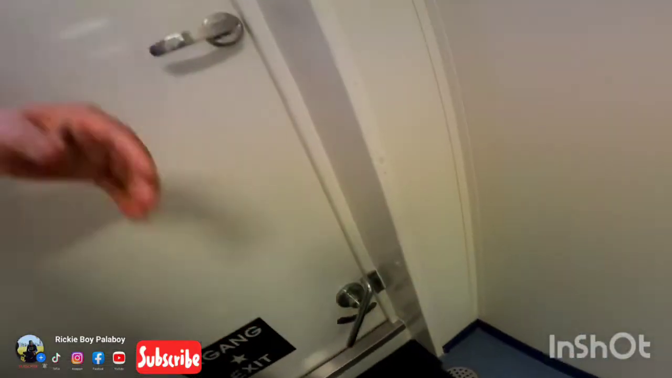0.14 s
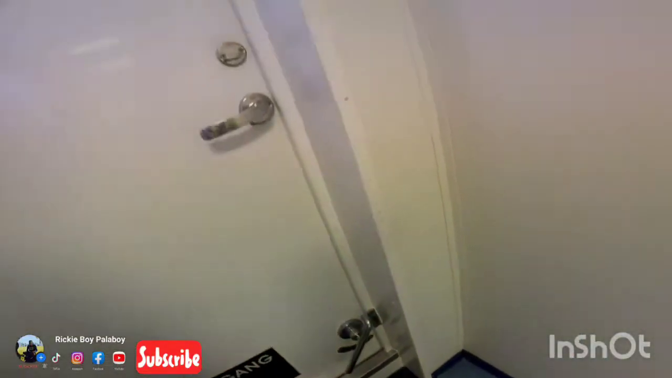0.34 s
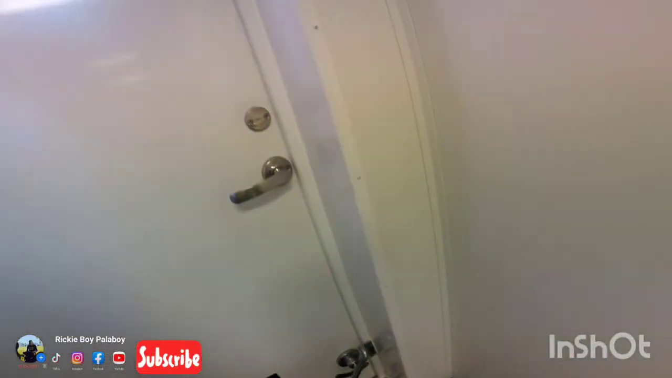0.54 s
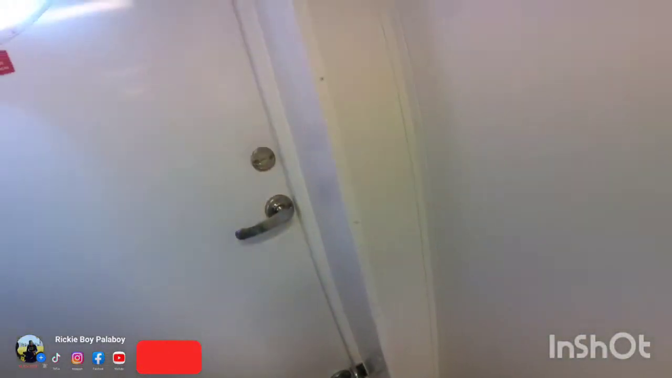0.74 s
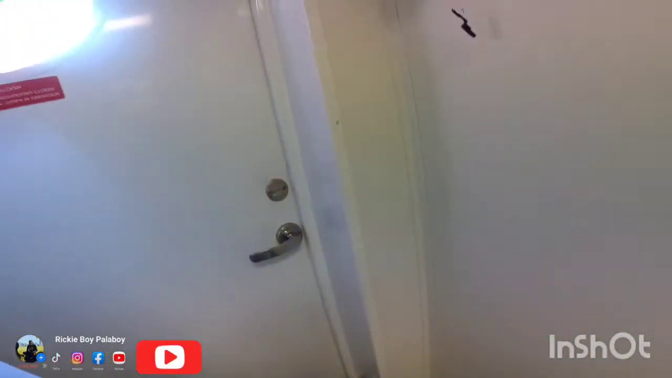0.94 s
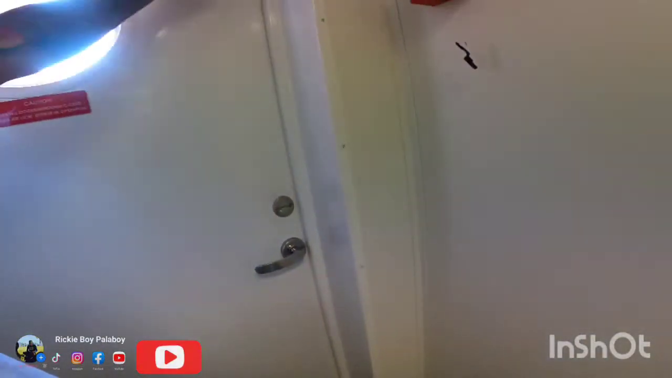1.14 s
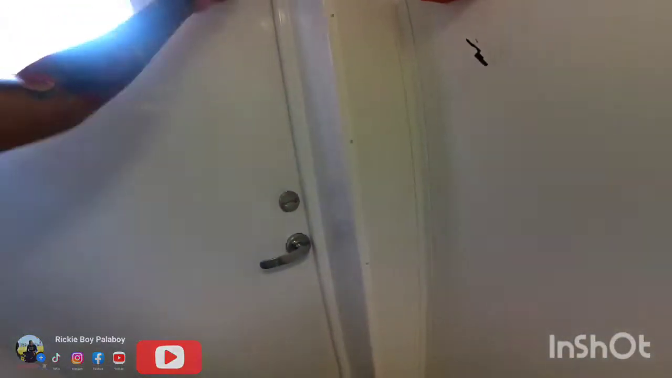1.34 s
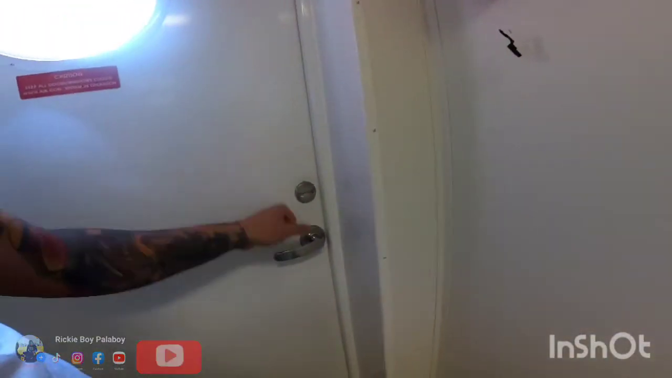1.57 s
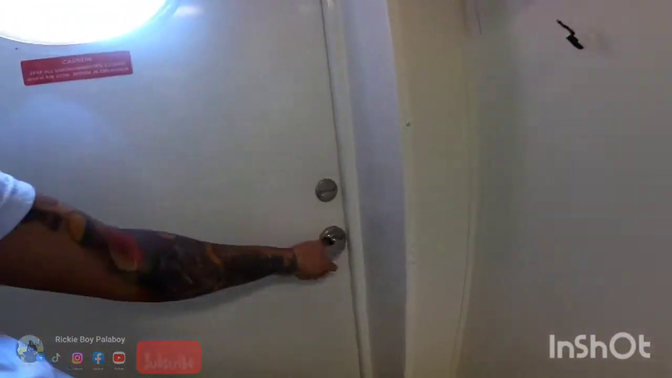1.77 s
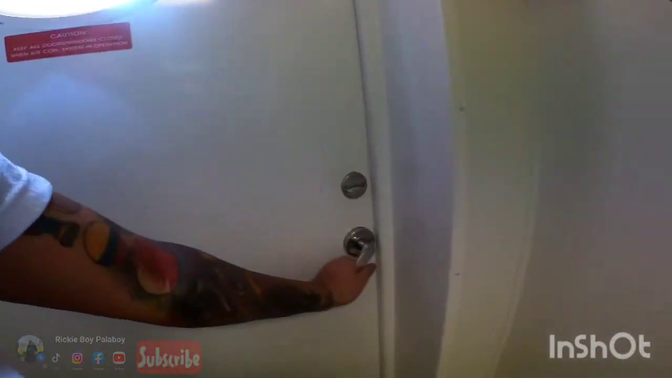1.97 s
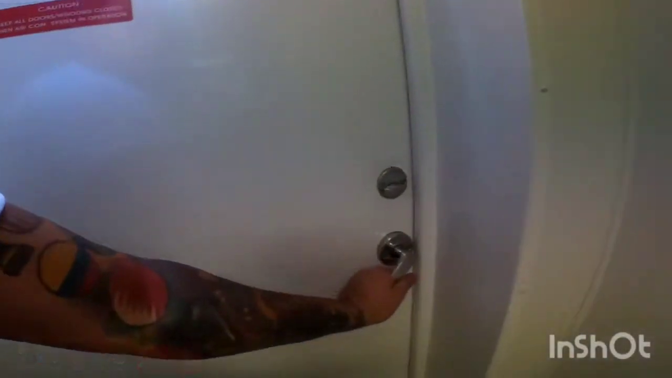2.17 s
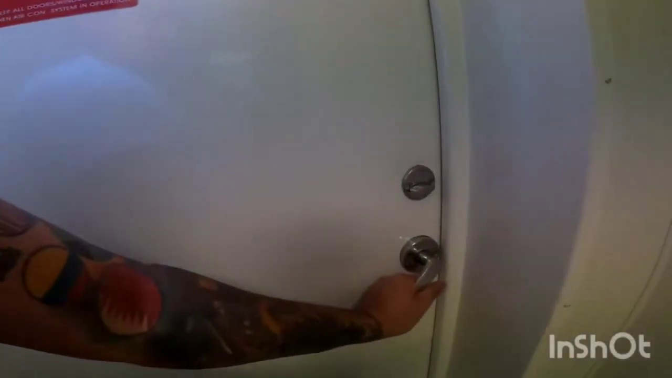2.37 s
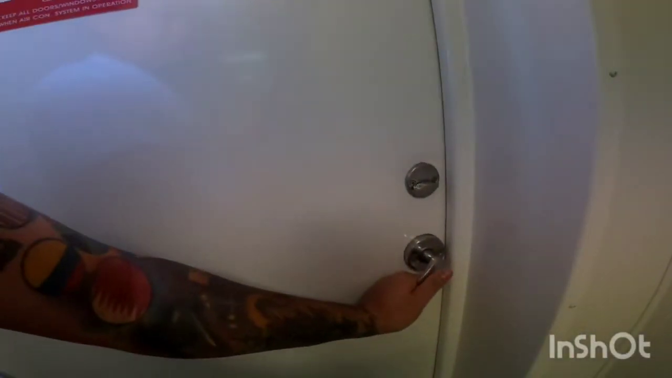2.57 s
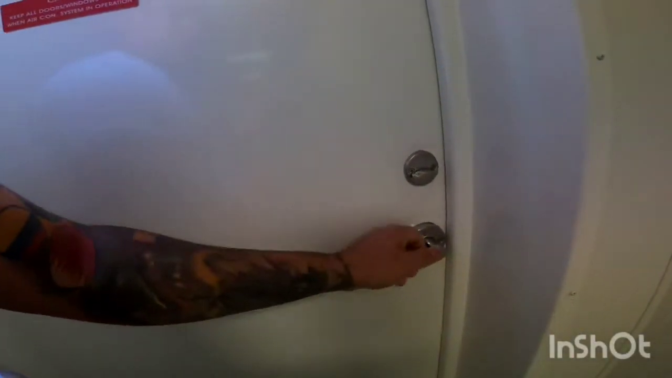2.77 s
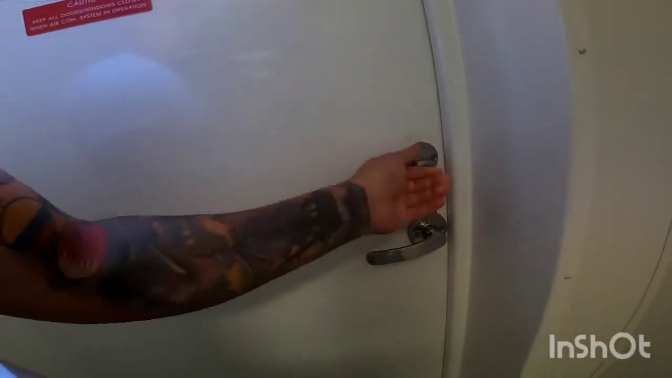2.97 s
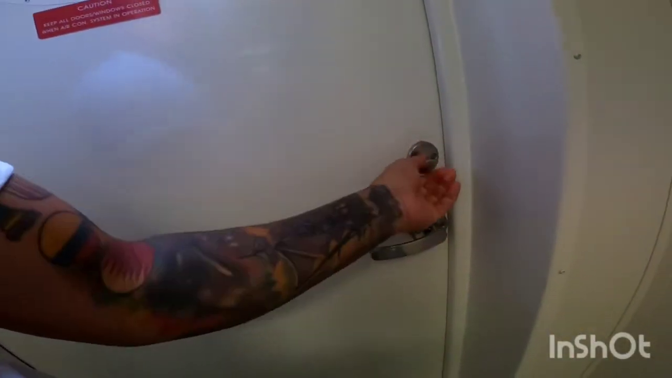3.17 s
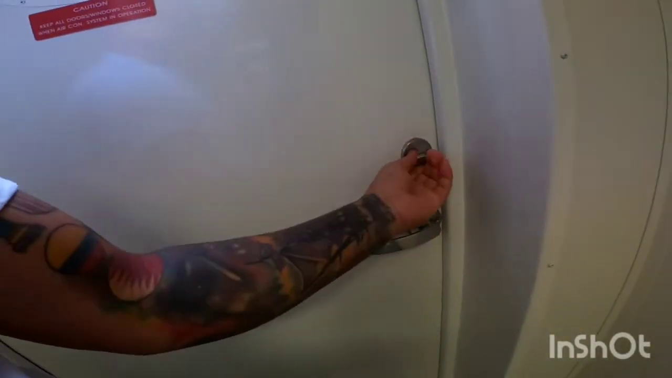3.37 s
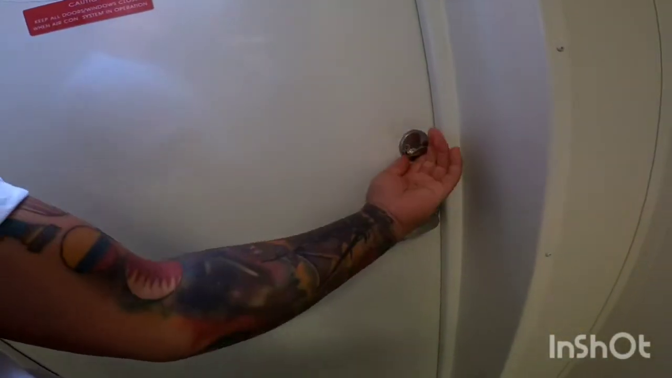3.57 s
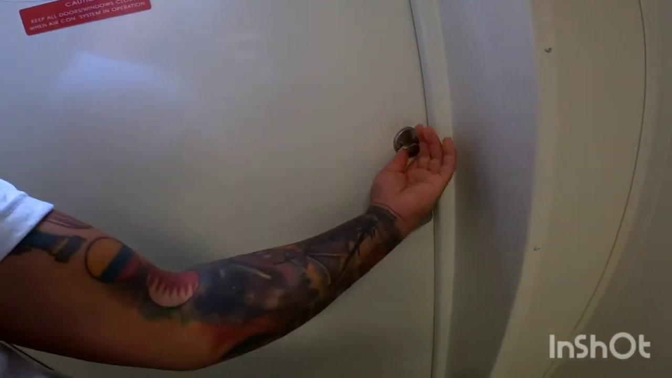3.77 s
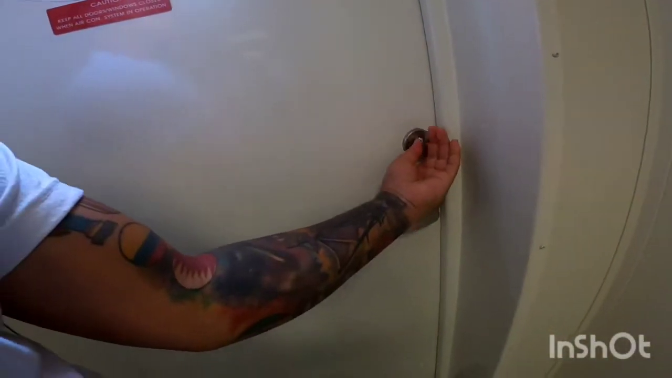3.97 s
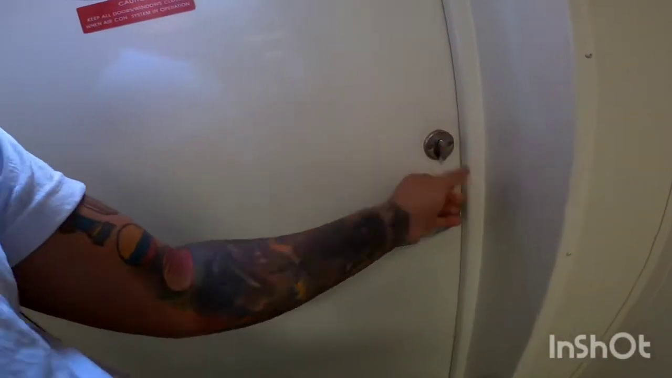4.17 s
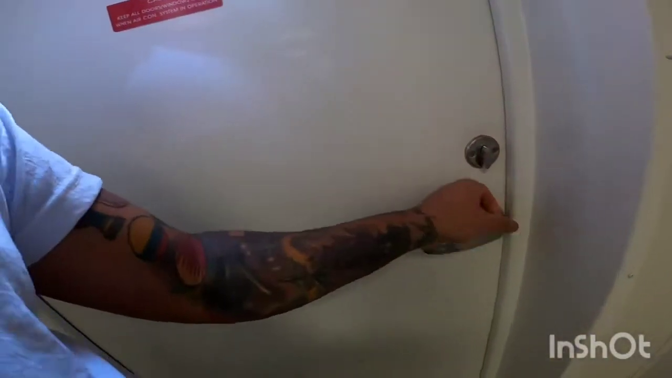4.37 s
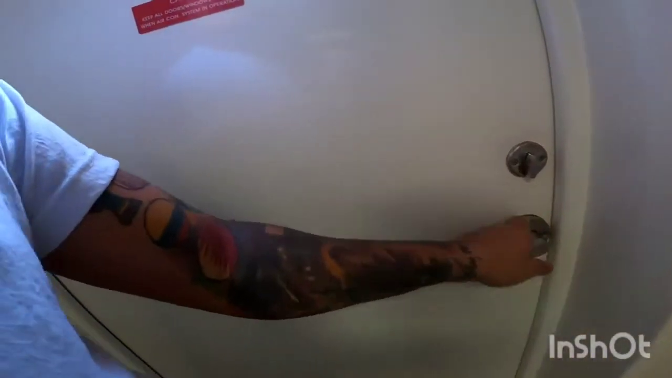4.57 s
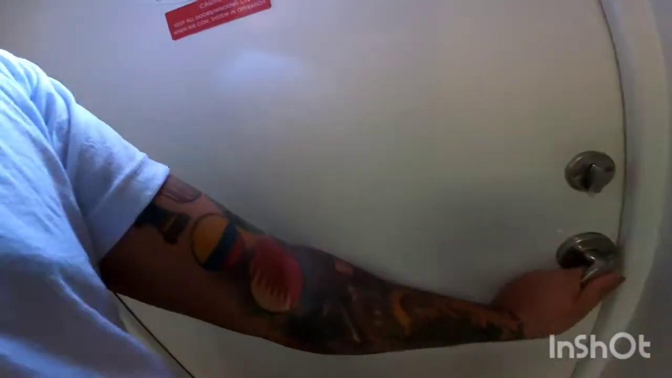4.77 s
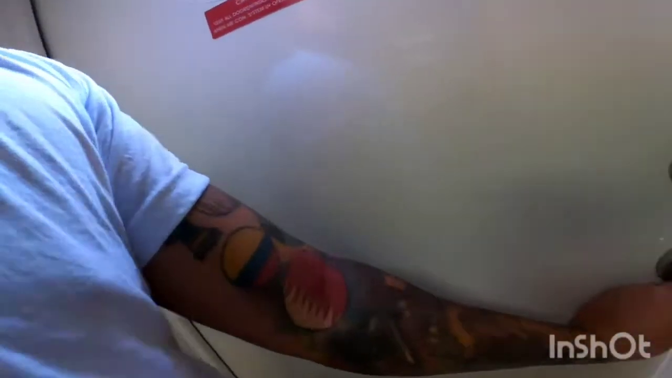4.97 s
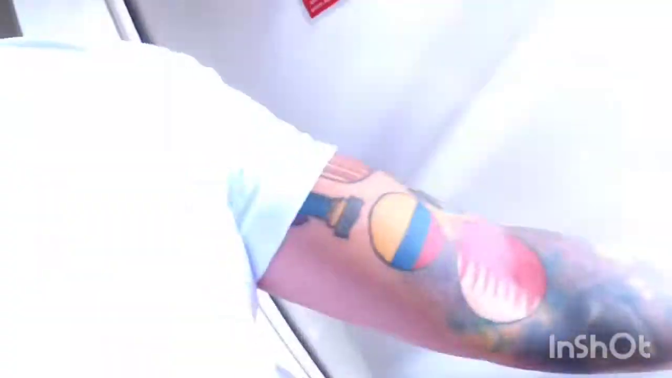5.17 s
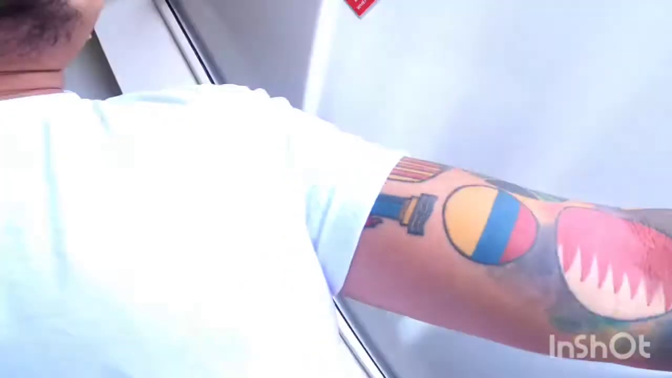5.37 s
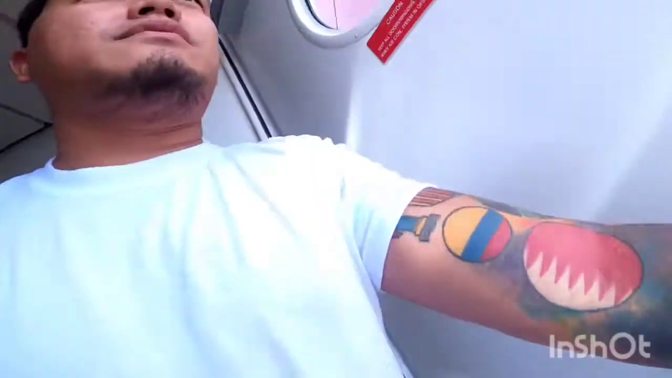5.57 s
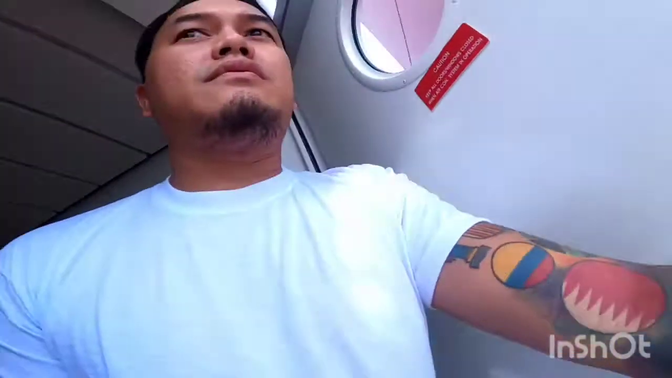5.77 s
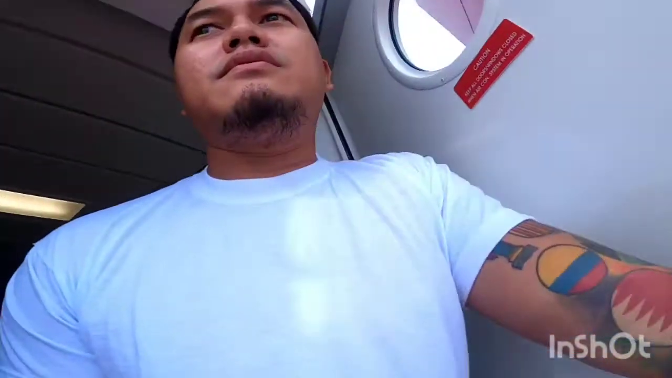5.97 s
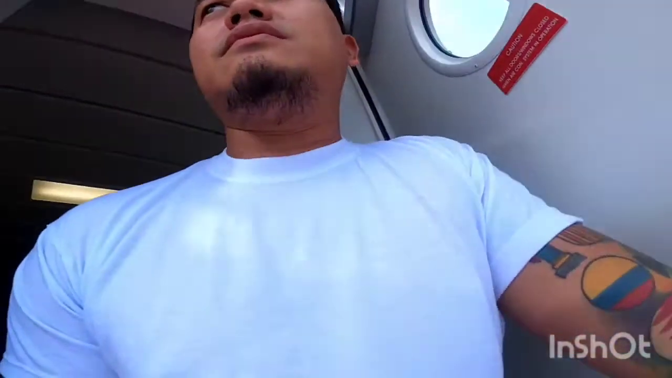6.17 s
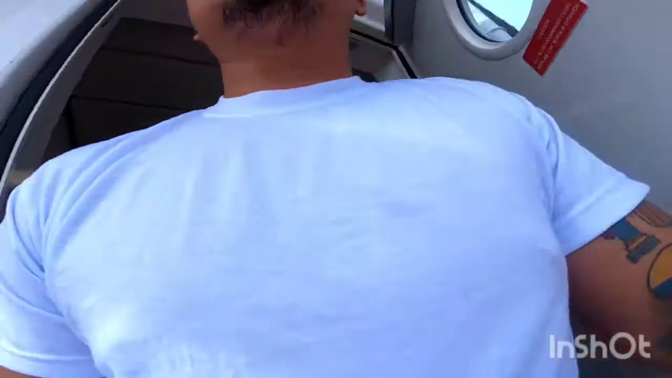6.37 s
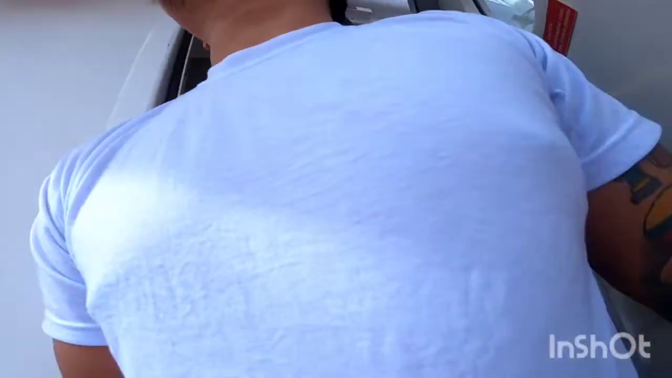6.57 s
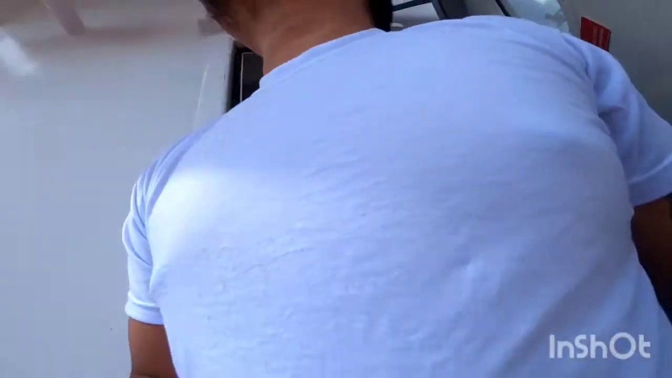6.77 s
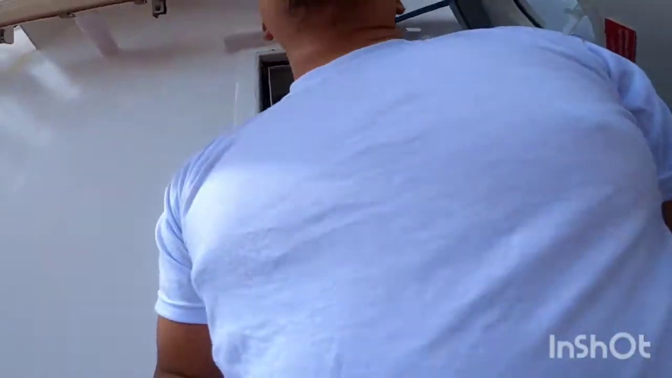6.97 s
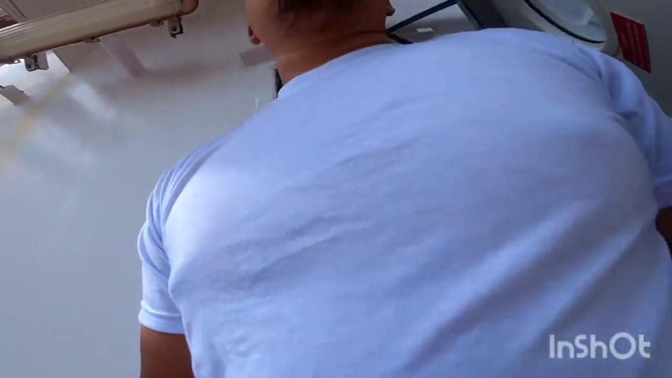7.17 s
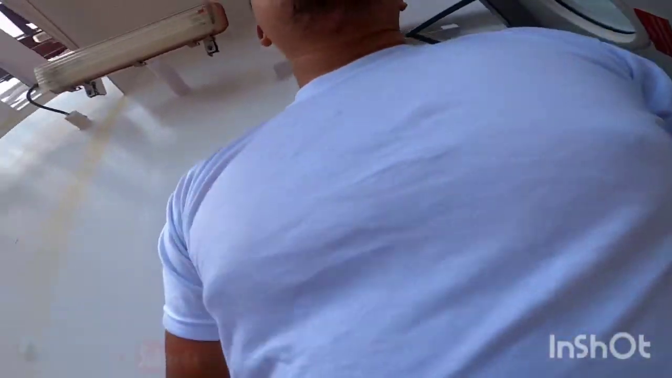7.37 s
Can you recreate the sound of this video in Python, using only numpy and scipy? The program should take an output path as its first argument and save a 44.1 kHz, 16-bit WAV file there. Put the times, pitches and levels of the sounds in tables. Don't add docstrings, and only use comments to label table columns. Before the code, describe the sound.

Low hull throb, close metal clacks and a heavy door's boom, then machinery and ventilation drone flooding in as the door swings out.

```python
import sys
import numpy as np
from scipy import signal
from scipy.fft import rfft, irfft
from scipy.io import wavfile
from scipy.ndimage import uniform_filter1d

SR = 44100
rng = np.random.default_rng(int(sys.argv[2]) if len(sys.argv) > 2 else 0)


def ratio_of_db(decibels):
    return 10 ** (np.asarray(decibels, float) / 20)


def inscribe(sig):
    pcm = np.round(np.clip(np.atleast_2d(sig).T, -1, 1) * 32767)
    wavfile.write(sys.argv[1], SR, pcm.astype(np.int16))


N = 328104


def evened(x):
    return x / np.sqrt(np.mean(x ** 2) + 1e-20)


def read(points, hz):
    f, value = np.transpose(points)
    return np.interp(np.log(hz + 1), np.log(f + 1), value)


def played(rows, t):
    s, *columns = np.transpose(rows)
    from_start = (s[0] < 0.05) * (t < 0.1)
    to_end = (s[-1] > 7.3) * (t > 7)
    gate = np.clip(np.minimum(t - s[0], s[-1] - t) / 0.021 + from_start + to_end, 0, 1)
    return gate, *(np.interp(t, s, column) for column in columns)


def peaks_db(modes, hz):
    return sum(db / (1 + (2 * (hz - f) / width) ** 2) for f, width, db in modes)


def add(mix, s, sound):
    part = mix[round(s * SR):][:len(sound)]
    part += sound[:len(part)]


def bump(t, middle, length):
    return np.cos(np.pi * np.clip((t - middle) / length, -0.5, 0.5))


def passing(rows, t):
    return sum(np.array(db)[:, None] * bump(t, s, length) ** 2 for s, length, *db in rows)


def drift(rate):
    t = np.arange(N) / SR
    waves = [np.sin(2 * np.pi * (f * t + rng.random())) / np.sqrt(f) for f in np.geomspace(1.6, rate, 16)]
    return evened(sum(waves))


# (frequency [Hz], lead [radians])
LEFT_LEAD = [(250, 0), (500, -.2), (1000, -.75), (1600, -.55), (2800, -.8), (4000, -1.0), (5500, -.5)]
# (time [s], share of the lead)
FACING = [(0, .1), (1.3, 0.14), (2.0, 0.74), (6.1, 0.9), (6.7, 0.53), (7.44, 0.43)]
HOP = 256


def noise(field_db, same, lean, band, patchy_db, size=2048, turn=((0, 1), (8, 1))):
    hz = np.fft.rfftfreq(size, 1 / SR)[:, None]
    t = np.arange(N // HOP + 9) * HOP / SR
    a, b, c, d, patches = rng.standard_normal((len(t), len(hz), 5)).T
    patches = uniform_filter1d(patches, size=size // 128, axis=0)
    patches = evened(uniform_filter1d(patches, size=16, axis=1))
    colour_db, moves = field_db(hz, t)
    inband = (hz > band[0]) & (hz < band[1])
    unit = np.sqrt(np.sum(ratio_of_db(2 * colour_db) * inband) * 4 * HOP / size / 0.68)
    like = np.clip(read(same, hz), 0, 1)
    lag = np.exp(-1j * read(LEFT_LEAD, hz) * played(FACING, t)[1])
    left = a + 1j * b
    right = like * left * lag + np.sqrt(1 - like ** 2) * (c + 1j * d)
    lean_db = read(lean, hz) / 2 * np.interp(t, *np.transpose(turn))
    z = np.array([left * ratio_of_db(lean_db), right / ratio_of_db(lean_db)])
    z = z * ratio_of_db(colour_db + patchy_db * patches) * moves / unit
    return signal.istft(z, nperseg=size, noverlap=size - HOP)[1][:, :N]


# (time [s], level [dB])
INSIDE = [(0, -47), (1.55, -45), (2, -42.5), (2.6, -45), (4.5, -42.5), (4.9, -40.5), (5.3, -39)]
# (frequency [Hz], level [dB per Hz])
INSIDE_COLOUR = [(20, -5.5), (70, -0.5), (110, -11.5), (250, -18.5), (450, -22), (600, -27), (1100, -31),
                 (1650, -35.5), (2000, -42.5), (2800, -50.5), (4000, -57), (5500, -60.5), (8000, -67.5),
                 (10000, -80), (15000, -86.5)]
# (frequency [Hz], width [Hz], level [dB])
DUCTS = [(73.4, 5.5, -4), (152, 24, 6.5), (261.5, 47, 6), (311.3, 29, 5.5), (457, 27.6, 9), (850, 130, 0.5)]
# (frequency [Hz], likeness [0-1])
SAME_IN = [(60, 1), (270, 1), (580, 0.94), (1100, 1), (2800, 0.72), (4000, 0.43), (5500, .1)]
# (frequency [Hz], left minus right [dB])
LEAN_IN = [(600, -0.5), (1100, 0.5), (2800, 3), (5500, 1), (15000, -1.5)]


def inside():
    def field(hz, t):
        gate, level_db = played(INSIDE, t)
        return read(INSIDE_COLOUR, hz) + peaks_db(DUCTS, hz) * 0.6, gate * ratio_of_db(level_db)
    return noise(field, SAME_IN, LEAN_IN, (250, 2000), patchy_db=1.44)


# (middle [s], length [s], level [dB], pitch [Hz])
SWELLS = [(0.03, 0.27, -26.5, 43.7), (0.263, 0.36, -32, 44.9), (0.56, 0.62, -30.5, 44.33),
          (0.75, 0.11, -23, 44.7), (1.02, 0.54, -26.5, 44.95), (1.268, 0.1, -28.5, 45.6),
          (1.85, 0.85, -25, 43.48), (2.15, 0.56, -24.5, 40.6), (2.693, 0.32, -34, 42.4),
          (3.003, 0.49, -34.5, 43.2), (3.304, 0.23, -26, 44.06), (3.562, 0.84, -32, 43.8),
          (4.077, 0.36, -25.5, 44), (4.373, 0.29, -26, 44), (4.708, 0.22, -28, 46.6),
          (5.094, 0.7, -30.5, 43.7), (5.521, 0.84, -27.5, 42.53), (5.843, 0.089, -28, 52),
          (6.2, 0.74, -31.5, 45.14), (6.833, 0.46, -34, 42.5), (7.26, 0.36, -36, 42)]


def throb():
    out = np.zeros(N)
    for s, length, db, hz in SWELLS:
        start = max(s - length / 2, 0)
        now = np.arange(start, s + length / 2, 1 / SR)
        turn = 2 * np.pi * (hz * now + rng.random())
        wave = np.sin(turn) - ratio_of_db(-18) * np.cos(2 * turn)
        add(out, start, ratio_of_db(db) * bump(now, s, length) * wave)
    return out


# (middle [s], length [s], level [dB])
PUMP = [
    (0.702, 1.3, -50),
    (2.004, 0.89, -49),
    (4.152, 2.9, -48.5),
    (6.207, 2.2, -34.5),
]
PUMP_HZ = 147.6


def pump():
    t = np.arange(N) / SR
    hum = np.sin(2 * np.pi * np.cumsum(PUMP_HZ * (1 + 0.01197 * drift(13))) / SR) * ratio_of_db(3.9 * drift(22))
    return hum * sum(ratio_of_db(db) * bump(t, s, length) for s, length, db in PUMP)


FAN_HZ = 196.95
FAN_RISE_S, FAN_OPEN_S = 4.75, 5.236
FAN_SHUT_DB = [-51.5, -57.5, -67, -81.5]
FAN_OPEN_DB = [-27, -36, -46, -47]
# (middle [s], length [s], tone [dB], second multiple [dB], upper multiples [dB])
NODES = [
    (5.3, 1, -1, 5, 4),
    (6.15, 1, 1, -6, -4),
    (6.6, 0.47, -3.5, -2, 2),
    (7.0, 0.19, -5.5, 0, 0),
    (7.2, 0.89, 1.5, 0, 0),
]


def fan():
    t = np.arange(N) / SR
    turns = np.cumsum(FAN_HZ * (1 + 0.0053 * drift(12))) / SR
    opened = np.clip((t - FAN_RISE_S) / (FAN_OPEN_S - FAN_RISE_S), 0, 1)
    first_db, second_db, upper_db = passing(NODES, t)
    out = np.zeros(N)
    for k, node_db in enumerate([first_db, second_db, upper_db, upper_db]):
        db = FAN_SHUT_DB[k] + opened * (FAN_OPEN_DB[k] - FAN_SHUT_DB[k] + node_db)
        out = out + ratio_of_db(db + 1.9 * drift(20)) * np.sin(2 * np.pi * (k + 1) * turns)
    return out


# (time [s], factor on the lean)
TURN = [(4.6, .5), (5.5, .4), (6.1, 0.87), (6.7, 1.5), (7.44, 1.7)]


def tones():
    lean_db = 0.27 * np.interp(np.arange(N) / SR, *np.transpose(TURN)) * np.array([[0.5], [-0.5]])
    return np.sqrt(2) * (throb() + pump() + fan()) * ratio_of_db(lean_db)


# (time [s], opening [dB])
DOOR = [(4.6, -44), (4.8, -38), (4.95, -13), (5.05, -7.5), (5.15, -1.5), (5.5, -1), (5.9, .5), (6.3, -2.5),
        (6.6, 0.5), (7.0, 1), (7.3, 0.5), (7.44, 0.5)]
# (frequency [Hz], level [dB per Hz])
DECK_COLOUR = [(20, -18), (60, 5.5), (110, -3), (240, -2), (470, -1.5), (560, -6), (1000, -10), (1200, -15),
               (2700, -26.5), (4000, -35.5), (5200, -43), (6300, -50.5), (7600, -50.5), (9500, -63.5),
               (15000, -75)]
# (middle [s], length [s], boom [dB], echo [dB], brightness [dB])
PLACES = [
    (5.0, 0.39, 4, 3, 4.5),
    (5.28, 0.59, 15, -2, -4.5),
    (5.9, 0.45, -6.5, 4.5, 2),
    (5.945, 0.13, -4, -2.5, 4),
    (6.27, 0.87, 0, 6, 2.5),
    (6.85, 0.97, 1.5, -3, 0.5),
    (7.44, 0.12, 1, 3.5, 1.5),
]
# (frequency [Hz], share of the control)
BOOM = [(480, 0.093), (750, 0.45), (1100, 0.26)]
ECHO = [(950, 0.0035), (1300, 1), (1900, 0.083)]
BRIGHT = [(900, 0.051), (2500, 1.2), (9000, 1.4)]
# (time [s], factor)
ECHO_SHIFT = [(5.0, 1.23), (5.8, 1), (6.1, 0.84), (6.55, 1.15), (6.9, 0.96), (7.4, 1.1)]
# (middle [s], length [s], rumble [dB], duct swap [dB])
VENTS = [
    (5.1, .4, -5, 0.5),
    (5.6, 0.8, -2.5, -2),
    (6.3, 0.85, 3, 0),
    (6.8, 1, 1.5, 4),
    (7.25, 0.6, -0.5, 1.5),
]
# (frequency [Hz], share of the control)
RUMBLE = [(40, .3), (90, 1), (125, 0.85), (170, 0)]
# (frequency [Hz], share of the control)
DUCT_SWAP = [(225, -0.33), (262, -1.7), (290, -0.24), (320, 0.79), (370, 0.045)]
# (frequency [Hz], likeness [0-1])
SAME_OUT = [(60, .7), (110, .86), (240, .99), (560, .9), (1200, .66), (2700, .68), (4000, .42), (5500, .06)]
# (frequency [Hz], left minus right [dB])
LEAN_OUT = [(240, 0.1), (470, 2), (1000, 2.5), (2700, 3.5), (4000, 3.5), (5500, 2), (9500, 1.5),
            (15000, -2)]


def deck():
    def field(hz, t):
        gate, open_db = played(DOOR, t)
        boom_db, echo_db, bright_db = passing(PLACES, t)
        rumble_db, swap_db = passing(VENTS, t)
        moves_db = -22.5 + open_db
        moves_db = moves_db + rumble_db * read(RUMBLE, hz) + swap_db * read(DUCT_SWAP, hz)
        moves_db = moves_db + (boom_db - 0.5) * read(BOOM, hz) + (bright_db + 2) * read(BRIGHT, hz)
        moves_db = moves_db + echo_db * read(ECHO, hz / played(ECHO_SHIFT, t)[1])
        return read(DECK_COLOUR, hz) + peaks_db(DUCTS, hz), gate * ratio_of_db(moves_db)
    return noise(field, SAME_OUT, LEAN_OUT, (220, 520), patchy_db=0.58, turn=TURN)


# (frequency [Hz], t60 [s])
LOBBY = [(250, 0.94), (1000, 0.66), (2500, 0.5), (4300, 0.77), (5500, 0.7), (7000, 0.71), (9000, 0.45),
         (13000, 0.42), (15500, 0.16)]
# (frequency [Hz], likeness [0-1])
SAME_WET = [(250, .99), (600, .8), (1200, .7), (2800, .55), (4300, .2), (6000, .05)]


def lobby(x):
    taps = np.zeros((2, SR))
    slots = np.arange(120, SR - 20, 20)
    at = slots + rng.integers(0, 20, (2, len(slots)))
    np.put_along_axis(taps, at, rng.choice([-1., 1.], at.shape), 1)
    hz, t, z = signal.stft(taps, SR, nperseg=256)
    hz = hz[:, None]
    like = read(SAME_WET, hz)
    shared = like * z[0] * np.exp(-1j * read(LEFT_LEAD, hz))
    z[1] = (shared + np.sqrt(1 - like ** 2) * z[1]) / ratio_of_db(read(LEAN_IN, hz))
    dying = np.minimum(0.66 + t / 0.19, 1) * ratio_of_db(-60 * t / read(LOBBY, hz))
    tail = signal.istft(z * dying, SR, nperseg=256)[1]
    return signal.fftconvolve(x[None], tail / np.linalg.norm(tail[0]), axes=1)[:, :N]


# (peak [s], level [dB], rise [s], fall [s], top hiss [dB])
STROKES = [
    (.35, -64, 0.43, 0.27, -10.5),
    (.62, -59, 0.49, 0.26, -8),
    (1.07, -51, 0.29, 0.16, -9),
    (1.22, -53.5, 0.22, 0.14, -8),
    (1.64, -53.5, 0.11, 0.41, -14),
    (2.08, -54, 0.062, 0.33, -9),
    (2.5, -64.5, .5, 0.45, -10.5),
    (5.93, -41, 0.051, 0.15, -16.5),
    (6.0, -50, 0.09, .35, -20),
]
# (frequency [Hz], share of the control)
TOP_HISS = [(5000, 0.9), (7000, 0.12), (11000, 0.88)]
# (frequency [Hz], level [dB per Hz])
RUB_COLOUR = [(2000, 0), (3000, -3), (5000, -8.5), (6000, -16.5), (8500, -21.5), (9500, -22.5),
              (11000, -23), (15300, -29.5)]
# (frequency [Hz], width [Hz], level [dB])
RUB_BANDS = [(4100, 800, 6), (5200, 500, 5), (7500, 900, 5), (12700, 2400, 8)]


def rubs():
    def field(hz, t):
        strokes = 0
        for s, db, rise, fall, top_db in STROKES:
            away = np.maximum((s - t) / rise, (t - s) / fall)
            stroke_db = db + top_db * read(TOP_HISS, hz) - 13 * away
            strokes = strokes + ratio_of_db(stroke_db) * np.clip(8 - 5 * away, 0, 1)
        return read(RUB_COLOUR, hz) + peaks_db(RUB_BANDS, hz), strokes
    same = [(2000, 0.8), (4000, 0.58), (6000, 0.15), (12000, 0.3)]  # (Hz, likeness)
    lean = [(3000, 2.5), (5500, 0), (12000, 1.5)]  # (Hz, left minus right dB)
    return noise(field, same, lean, (3200, 8000), patchy_db=0.4, size=1024)


def ring(db, hz, spread, t60, rise):
    t = np.arange(round(t60 * SR)) / SR
    place, start = rng.random((2, 48, 1))
    phase = start * min(8 * spread - 0.24, 1)
    modes = np.sin(2 * np.pi * (hz * (1 + spread * (2 * place - 1)) * t + phase))
    return ratio_of_db(db - 60 * t / t60) * evened(modes.sum(0)) * np.minimum(t / rise, 1)


def rings(rows, rise):
    out = np.zeros(N)
    for s, *part in rows:
        add(out, s, ring(*part, rise=rise))
    return out


# (time [s], peak [dB], pitch [Hz], spread of the modes [0-1], t60 [s])
THUMPS = [(1.061, -31, 300, .4, .35), (1.062, -37, 520, .3, .45), (1.071, -23, 21.5, .04, .55),
          (1.865, -36, 400, .3, .21), (2.129, -31.5, 330, .25, .21), (2.13, -30, 171, .14, .3),
          (2.133, -26, 21.3, .04, 1.2), (2.185, -36, 601, .5, .1), (3.379, -34, 150, .36, .31),
          (4.055, -35, 192.5, .2, .28), (4.057, -40, 449, .21, .8), (4.872, -34, 209, .09, .21)]


def leaf_booms():
    return rings(THUMPS, rise=0.0082)


# (time [s], peak [dB], pitch [Hz], t60 [s])
TINKS = [(.135, -65, 3500, 0.032), (.172, -61, 3300, .035), (0.33, -53.5, 6440, 0.058),
         (.385, -69, 6300, .06), (2.774, -54, 5000, .05), (3.307, -52, 5730, 0.029),
         (3.467, -71, 5600, .027), (3.552, -65, 4340, 0.018), (5.011, -55, 7370, 0.052),
         (5.082, -44.5, 4850, 0.028), (6.84, -47.5, 4400, .04)]


def tinks():
    return rings([(s, db, hz, 0.079, t60) for s, db, hz, t60 in TINKS], rise=0.0012)


# (pitch [Hz], level [dB], spread [0-1], t60 [s])
SPRING = [(7800, -6, .05, 0.06), (7700, -13, .01, 0.3), (6710, -11, 0.03, 0.2), (8840, -13, 0, .15),
          (10700, -12, .1, .06), (13000, -12, .15, .04)]
# (time [s], peak [dB])
SPRING_HITS = [
    (3.053, -60),
]


def spring():
    rows = [(s, db + mode_db, hz, spread, t60) for s, db in SPRING_HITS for hz, mode_db, spread, t60 in SPRING]
    return rings(rows, rise=0.0012)


# (time [s], peak [dB], pitch [Hz], spread of the modes [0-1], t60 [s])
CLANGS = [(1.0595, -43, 1600, 0.06, 0.068), (1.059, -46, 2600, 0.5, 0.3), (1.058, -49, 3700, 0.05, 0.041),
          (2.133, -46.5, 7340, 0.1, 0.047), (2.131, -39, 3920, 0.3, 0.078), (3.266, -37, 1670, 0.2, 0.094),
          (3.31, -47, 1606, 0.2, .2), (4.035, -53, 11000, .3, 0.04), (4.047, -36, 12770, .2, 0.05),
          (4.055, -29.5, 4240, .06, 0.058), (4.055, -32.5, 2390, 0.1, 0.13), (4.557, -64, 5870, .5, .046),
          (4.874, -39.5, 756, 0.09, 0.13)]


def clangs():
    return rings(CLANGS, rise=0.0012)


# (time [s], peak [dB], pitch [Hz], spread [0-1], t60 [s])
CHATTER = [(1.057, -35.5, 557, 0.2, 0.29), (1.0596, -35.5, 1630, .08, 0.05), (1.059, -39, 2700, 0.1, 0.09),
           (1.0572, -34, 3380, .15, 0.027), (1.845, -52, 3100, .2, .03), (1.856, -48, 4840, 0.1, 0.023),
           (1.861, -41, 1440, .05, 0.071), (1.862, -39.5, 3150, .08, 0.04), (1.916, -50, 1485, .15, 0.054),
           (2.074, -47, 2200, 0.5, .03), (2.086, -47, 1980, 0, 0.038), (2.1, -47, 3700, .4, 0.033),
           (2.143, -43, 4460, .3, 0.027), (2.155, -46, 2920, .1, .04), (2.184, -42, 2880, .1, .035),
           (2.185, -33, 900, 0.43, 0.035), (2.777, -48, 1410, 0.34, .04), (3.992, -37, 1800, 0.07, 0.039),
           (3.993, -43, 2850, .06, 0.046), (3.993, -45, 5300, .06, .04), (4.052, -35, 1850, .05, .09),
           (4.052, -34, 5900, .06, .07), (4.06, -48, 4240, .17, 0.67), (4.095, -62, 6530, .4, 0.41),
           (4.053, -34, 6350, 0.2, 0.061), (4.068, -46, 6900, 0.4, 0.044), (2.1135, -31, 2920, 0.4, 0.014),
           (3.265, -47, 2260, 0.41, .04), (3.053, -42, 1500, 0.43, .04), (4.481, -46, 900, .5, .04),
           (4.7527, -38, 1400, .2, 0.034), (4.81, -40, 1480, .15, 0.046), (4.811, -56.5, 3360, .08, .04),
           (4.81, -66, 4570, .06, 0.036), (4.868, -42, 1760, 0.2, .04), (4.93, -45, 3220, .12, .04)]
# (time [s], peak [dB], pitch [Hz], spread [0-1], t60
# [s])
MORE_CHATTER = [(1.058, -41, 1190, .1, .12), (1.0585, -54, 5100, .2, .14), (1.07, -48, 1500, .2, .2),
                (1.105, -53, 3400, .5, .06), (2.074, -56, 4700, .3, .02), (2.098, -55, 6100, .25, .02),
                (2.113, -47, 6900, .25, .016), (2.134, -42, 1900, .4, .03), (2.142, -41, 1150, .4, .026),
                (2.183, -50, 5000, .4, .022), (2.7755, -64, 12400, .25, .03), (3.306, -72, 12700, .1, .025),
                (3.8655, -59, 8050, .08, .05), (3.871, -70, 8150, .1, .4), (4.035, -54, 6400, .3, .045),
                (4.044, -43, 1650, .3, .032), (4.0505, -33.5, 4450, .2, .026), (4.061, -55, 6850, .07, .65),
                (4.069, -36, 1550, .4, .042), (4.069, -50.5, 5700, .3, .48), (4.071, -52, 4320, .05, .75),
                (4.08, -38.5, 1420, .3, .036), (4.08, -45, 4280, .15, .032), (4.096, -52.5, 9000, .3, .14)]


def chatter():
    return rings(CHATTER, rise=0.0023) + rings(MORE_CHATTER, rise=0.0023)


# (frequency [Hz], width [Hz], level [dB])
KNOCK_MODES = [(1220, 160, 7), (1630, 180, 8), (2200, 200, 7), (2750, 220, 7), (3750, 260, 6), (4300, 500, 6),
               (5500, 600, 4), (6900, 500, 5), (7800, 500, 3)]
LEAD_IN = 200


def knock(db, ring_hz, body_db, edge_db):
    t = np.arange(-LEAD_IN, 4096 - LEAD_IN) / SR
    hz = np.fft.rfftfreq(4096, 1 / SR)
    shape = [(150, body_db - 13.5), (450, body_db + 11.0), (900, body_db + 9.5), (1800, -4.0), (3200, -9.5),
             (5000, edge_db), (8000, edge_db - 7.0), (11000, edge_db - 11.0), (15000, edge_db - 28.5)]
    colour_db = read(shape, hz) + peaks_db([(ring_hz, 250, 5)], hz)
    colour_db = colour_db + peaks_db(KNOCK_MODES, hz * rng.uniform(0.97, 1.03))
    dying = ratio_of_db(-60 * t / 0.03) + ratio_of_db(-13 - 60 * t / 0.11)
    contact = rfft(rng.standard_normal(4096) * dying * np.clip(t / 0.0013, 0, 1))
    contact /= np.sqrt(uniform_filter1d(abs(contact) ** 2, size=16))
    rattle = irfft(contact * ratio_of_db(colour_db)) * np.clip(1 + t / 0.0025, 0, 1)
    return ratio_of_db(db) * rattle / abs(rattle).max()


# (time [s], peak [dB], body [dB], edge [dB])
LEVERS = [(1.0582, -25.5, -10, -22), (1.8503, -37, -16, -11), (1.862, -27, -5.5, -20),
          (1.8787, -31.5, -1, -29), (1.9122, -40, -3, -28), (1.957, -36, 2, -33), (2.016, -30.5, 5.5, -35),
          (2.088, -36.5, -14, -20), (2.1137, -28, -17, -19), (2.1203, -27, 15, -31), (2.13, -24, 10, -10.5),
          (2.136, -29.5, -7, -17.5), (2.183, -39, -11, -9)]
LOCK = [(2.777, -39, -2, -8), (2.838, -31, 1, -22), (3.0528, -42, -6, -14), (3.264, -34, -10, -23),
        (3.3076, -40, -3, -22), (3.381, -37, 1, -24), (3.5136, -42, 1.5, -37), (3.6206, -42, 1, -35),
        (3.8538, -37.5, -1, -35), (3.8663, -33.5, -1.5, -22), (3.9923, -31.5, -18, -14.5),
        (4.014, -31, -1.5, -14), (4.0492, -17, -14.5, -12), (4.0592, -14.5, -7, -18.5)]
HANDLE = [(4.4812, -40, 11, -29), (4.556, -50.5, -4, -24), (4.697, -43.5, 1, -40), (4.75, -38, 6.5, -34),
          (4.81, -34.5, 3, -22.5), (4.8739, -31.5, -6.5, -30), (4.9302, -36.5, 9.5, -15),
          (4.9383, -30, -12.5, -21), (5.083, -25.5, -13.5, -27), (5.919, -31, -17, -27)]
# (main ring [Hz], lobby share [dB])
PARTS = [
    (1530, -6.5),
    (1420, -5.5),
    (1210, -9),
]


def hardware():
    direct, wet = np.zeros((2, N))
    for rows, (ring_hz, wet_db) in zip([LEVERS, LOCK, HANDLE], PARTS):
        for s, db, body_db, edge_db in rows:
            sound = knock(db, ring_hz, body_db, edge_db)
            add(direct, s - LEAD_IN / SR, sound)
            add(wet, s, ratio_of_db(wet_db) * sound)
    return direct, wet


def scattered(x):
    length_s = 0.006
    t = np.arange(round(length_s * SR)) / SR
    taps = rng.standard_normal(len(t)) * ratio_of_db(-30 * t / length_s)
    treble = signal.lfilter(*signal.butter(1, 2000, "high", fs=SR), x)
    thrown = signal.oaconvolve(treble, taps / np.linalg.norm(taps))[:N]
    return ratio_of_db(-6) * thrown * np.array([[1], [-1]])


def at_microphones(metal):
    shaded = signal.lfilter([0.06, 0.34, 0.35, 0.053], [1], metal)
    facing = np.clip(played(FACING, np.arange(N) / SR)[1], 0, 1)
    left = facing * shaded + (1 - facing) * ratio_of_db(1) * metal
    return np.array([left, metal]) + scattered(metal)


def scene():
    knocks, wet = hardware()
    ringing = tinks() + spring() + clangs()
    around = lobby(wet + ratio_of_db(-12) * ringing) + leaf_booms() + tones() + inside() + deck() + rubs()
    return at_microphones(knocks + ringing + chatter()) + around


def roll_off(x):
    return signal.sosfilt(signal.butter(12, 15700, fs=SR, output="sos"), x)


def record(dry):
    return roll_off(dry)


dry = scene()
out = record(dry)
inscribe(out)
```